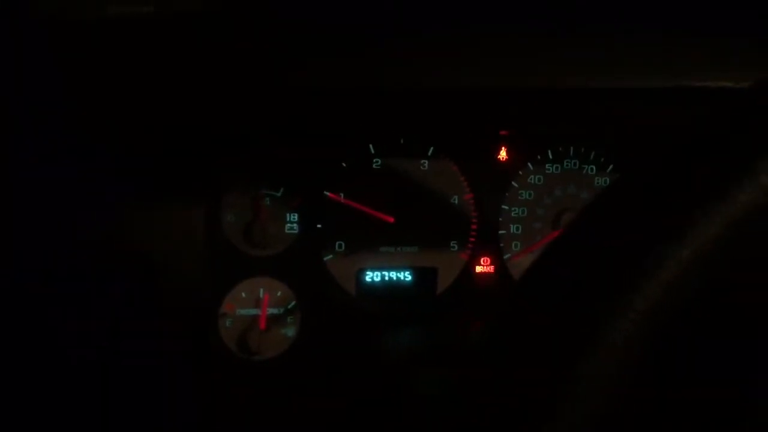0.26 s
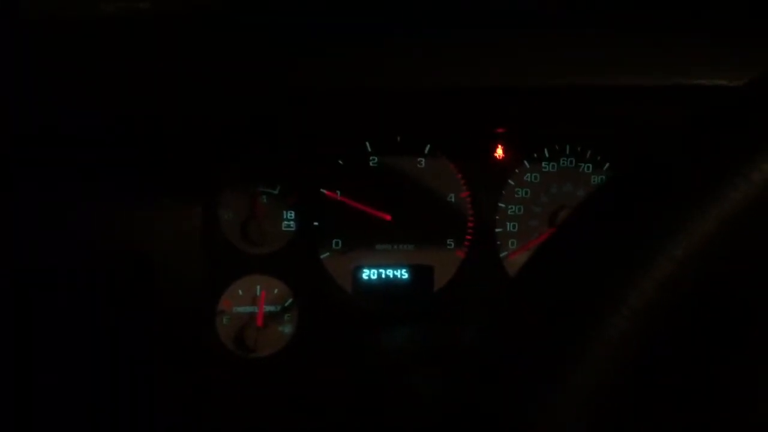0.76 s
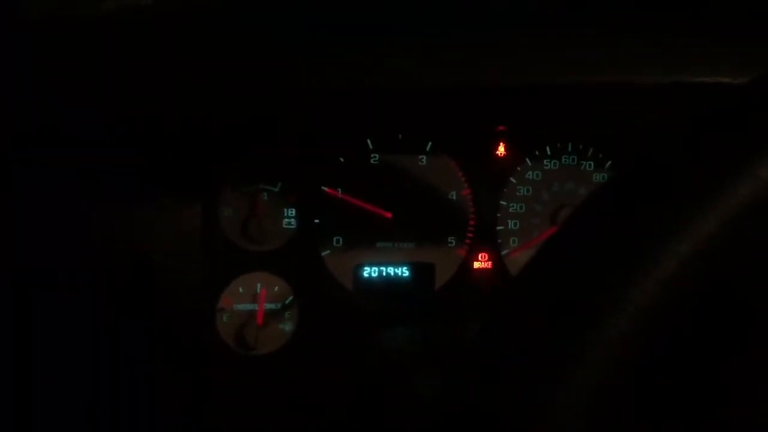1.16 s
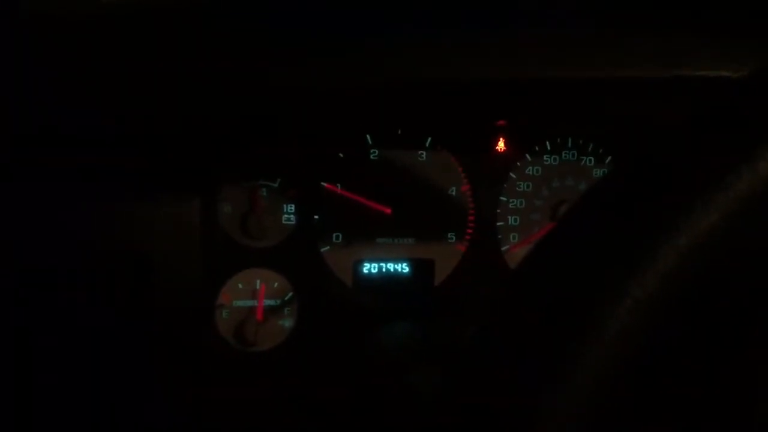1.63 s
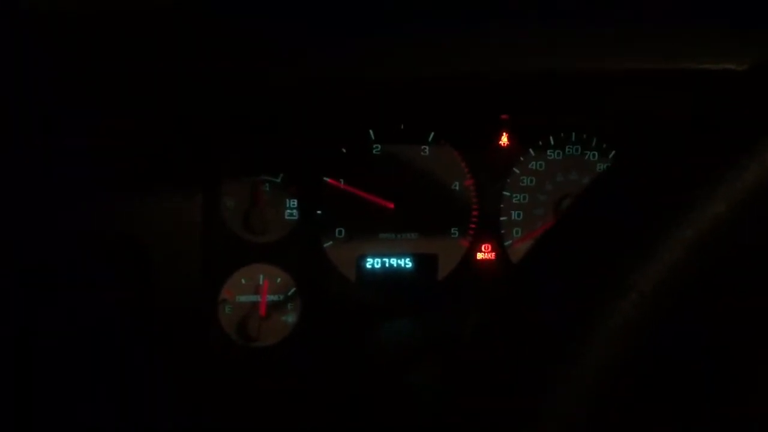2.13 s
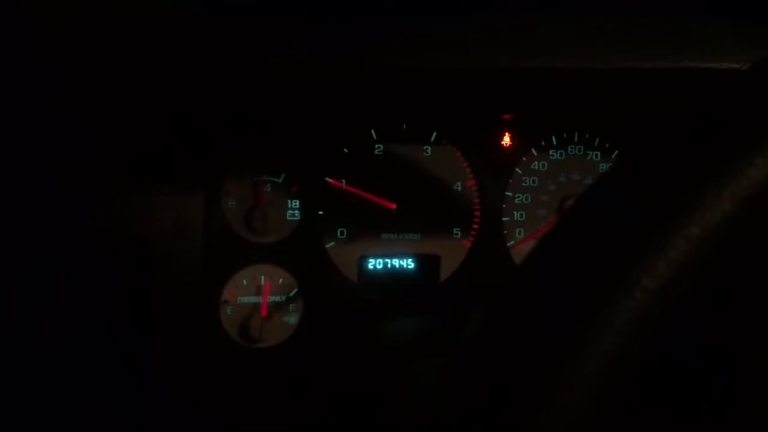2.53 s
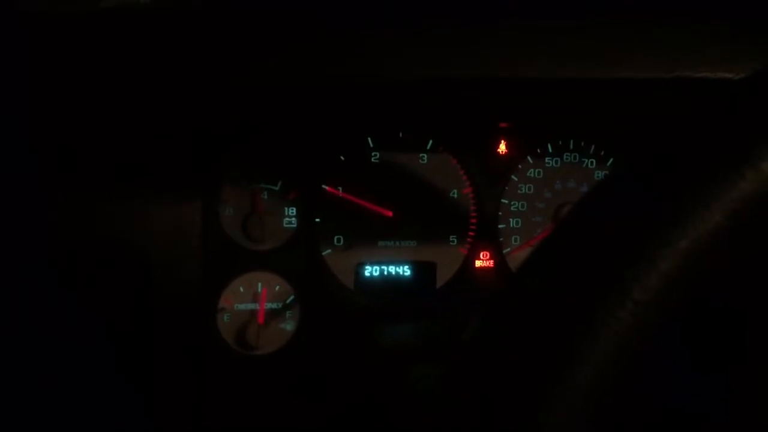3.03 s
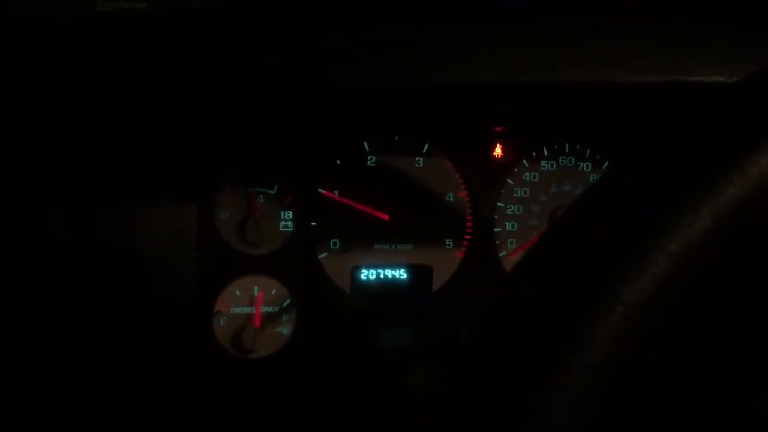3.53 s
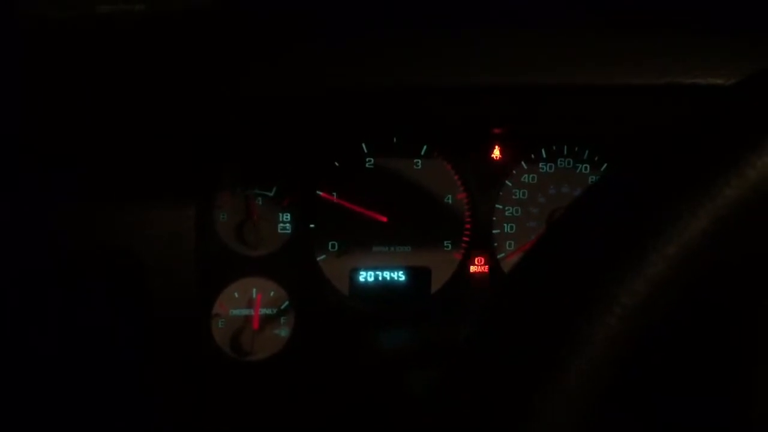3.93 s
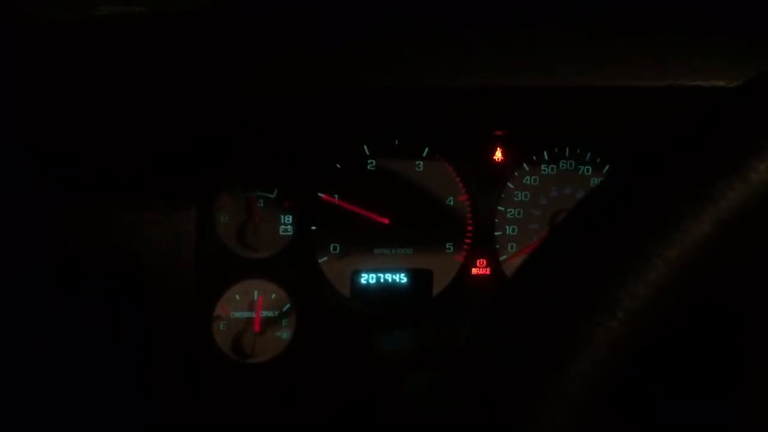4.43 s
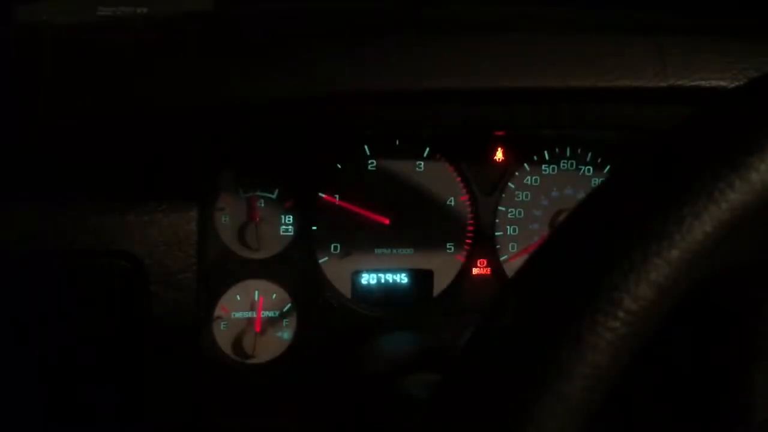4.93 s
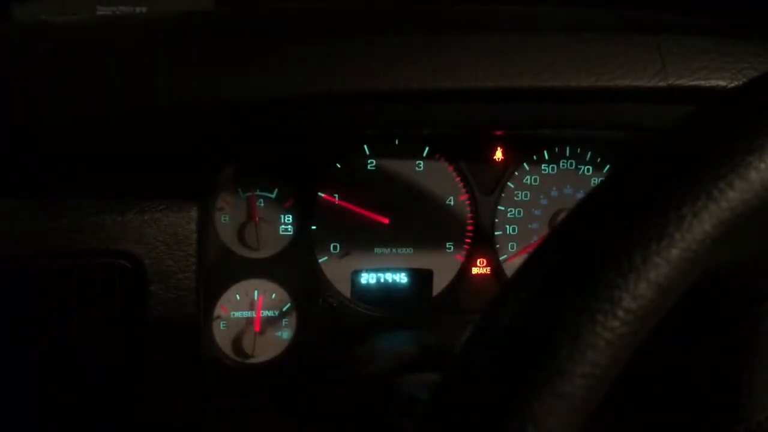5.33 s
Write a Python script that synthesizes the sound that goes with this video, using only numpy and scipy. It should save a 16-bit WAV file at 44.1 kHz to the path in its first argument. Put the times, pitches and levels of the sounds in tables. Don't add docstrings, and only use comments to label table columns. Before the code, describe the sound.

From 0 s a warm, heavy six-cylinder diesel is already idling at about 1000 rpm, heard inside a closed truck cab by a phone facing the dashboard. Deep, boomy low tones dominate, firing about fifty times a second with a slower rolling pattern repeating roughly eight times a second. Over them lies a dense, muffled mechanical clatter, dull in the treble, with light valve knocks, faint gear whine, tiny crisp injector ticks and very quiet airy hiss. The idle is even until about 2.3 s, when the pitch dips very slightly until about 2.6 s, then recovers by 3 s. From 3.6 to 4.2 s a longer load pulls the speed down again; the drone shifts colour, and whine and knocks soften. The engine partly recovers at 4.4 s and continues with small wavering, the load easing slightly towards the end. It cuts off abruptly near 5.6 s, still idling.

```python
import sys
import numpy as np
from scipy import signal
from scipy.fft import rfft, irfft
from scipy.io import wavfile

SR = 44100
rng = np.random.default_rng(int(sys.argv[2]) if len(sys.argv) > 2 else 0)


def amplitude_ratio(level_db):
    exponent = np.asarray(level_db, float) / 20
    return 10 ** exponent


def wav_record(signal):
    frames = np.transpose(np.atleast_2d(signal))
    bounded = np.clip(frames, -1, 1)
    quanta = np.round(bounded * 32767).astype(np.int16)
    wavfile.write(sys.argv[1], SR, quanta)


N = 246078


def level(x, db):
    return x * amplitude_ratio(db) / np.sqrt(np.mean(x ** 2))


def curve(points):
    table = np.array(points)
    return np.interp(np.arange(N) / SR, table[:, 0], table[:, 1])


def colour(x, spectrum):
    hz, db = np.transpose(spectrum)
    bins = np.maximum(np.arange(N // 2 + 1) * SR / N, 1)
    return irfft(rfft(x) * amplitude_ratio(np.interp(np.log(bins), np.log(hz), db)), N)


def ring(x, hz, width):
    return signal.lfilter(*signal.iirpeak(hz, hz / width, fs=SR), x)


def walk(rate):
    steps = int(N / SR * rate) + 2
    position = np.linspace(0, N / SR * rate, N)
    return np.interp(position, np.arange(steps), 1.2 * rng.standard_normal(steps))


def orders(table, cycle, load, sway_db, sway_rad, rate):
    out = np.zeros(N)
    for count, free_db, loaded_db, push in table:
        db = free_db + load * (loaded_db - free_db) + 1
        size = push * amplitude_ratio(db + sway_db * walk(rate))
        out += size * np.cos(2 * np.pi * count * cycle - 1.3 + sway_rad * walk(rate))
    return out


def cab_boom(cycle, load):
    # (vibrations per cycle, free level [dB], loaded level [dB], push +1 or pull -1)
    lines = [(5, -57, -59, -1), (6, -31, -32, -1), (7, -50, -54, -1), (8, -37, -40, -1), (9, -26, -27, 1),
             (10, -40, -41, -1), (11, -41, -44, 1), (12, -27, -26, 1), (13, -50, -48, 1), (14, -37, -49, 1),
             (15, -43, -39, 1), (16, -31, -37, -1), (17, -50, -44, -1), (18, -30, -28, 1),
             (19, -41, -43, 1), (20, -51, -46, 1), (21, -36, -40, 1), (22, -40, -38, 1), (23, -44, -49, -1),
             (24, -35, -40, 1), (25, -47, -47, 1), (26, -53, -49, 1), (27, -47, -49, 1), (28, -50, -49, -1),
             (30, -47, -41, 1), (31, -52, -53, 1), (36, -50, -49, -1)]
    peak = cycle - .788 + .004 * load
    return amplitude_ratio(1.88) * orders(lines, peak, load, sway_db=.6, sway_rad=.1, rate=7)


def gears(cycle, load):
    # (crank place where teeth line up [0-1], swell place [0-1], swell depth [0-1],
    # lines of (vibrations per cycle, free level [dB], loaded level [dB], push +1 or pull -1))
    trains = [
        (.19, .6, 0, [(38, -58, -54, 1), (39, -59, -58, -1), (42, -56, -61, 1), (50, -61, -56, -1)]),
        (.288, .3, .1, [(60, -59, -65, -1), (72, -58, -54, 1), (84, -58, -58, 1), (90, -59, -59, 1)]),
        (.723, .14, .7, [(100, -51, -63, -1), (102, -62, -62, 1), (105, -51, -54, -1)]),
        (.979, .45, .4, [(114, -58, -64, -1), (123, -58, -63, 1), (132, -58, -66, 1), (135, -59, -62, 1)]),
        (.616, .63, .6, [(140, -53, -64, 1), (144, -51, -61, -1), (146, -52, -49, -1)]),
        (.392, .2, .2, [(168, -60, -65, 1), (170, -62, -65, -1)]),
        (.066, .95, .45, [(261, -72, -76, 1), (267, -72, -79, 1), (269, -71, -79, 1)]),
    ]
    out = 0
    cycle = cycle + .0004 * walk(4)
    for at, swell_at, depth, table in trains:
        looseness = np.clip(1 - 2.6 * load, 0, 1)
        swell = 1 + depth * looseness * np.cos(2 * np.pi * (cycle - swell_at))
        out = out + swell * orders(table, cycle - at, load, sway_db=.8, sway_rad=.22, rate=5)
    return out * amplitude_ratio(1.8 + 1.2 * load)


def clatter(cycle, load):
    # (frequency [Hz], width [Hz], level [dB], loudest cycle place [0-1], swell depth [0-1])
    modes = [(600, 40, -3, .2, .1), (860, 60, -9, .14, .6), (1060, 120, -2, .47, .35),
             (1210, 40, -5, .63, .5), (1400, 70, -2, .2, .2), (2250, 100, -3, .95, .5)]
    # (frequency [Hz], level per Hz [dB])
    spectrum = [(30, -32), (60, 8), (100, 9), (170, 6), (260, 2), (400, -9.5), (520, -10), (800, -8.5),
                (1100, -10.5), (1500, -15.5), (1900, -21.5), (2600, -27), (3500, -35), (6000, -53)]
    repeat = 0.35
    length = SR * 6 // 50
    place = cycle % 1 * length
    habit = np.zeros(N)
    for share in (1 - load, load, 0.62 * walk(1.487), 0.21 * walk(1.8)):
        pattern = rng.standard_normal(length + 1)
        habit += share * np.interp(place, np.arange(length + 1), pattern)
    noise = np.sqrt(repeat) * level(habit, 0) + np.sqrt(1 - repeat) * rng.standard_normal(N)
    noise = noise * (1 + .04 * np.cos(2 * np.pi * (6 * cycle - .3)))
    walls = noise
    for hz, width, mode_db, at, depth in modes:
        swell = 1 + depth * (1 - 0.2 * load) * np.cos(2 * np.pi * (cycle - at))
        walls = walls + amplitude_ratio(mode_db + .5 * walk(1.3)) * swell * ring(noise, hz, width)
    walls = walls * amplitude_ratio(.4 * walk(4))
    return level(colour(walls, spectrum), -34)


def air_hiss():
    # (frequency [Hz], level per Hz [dB])
    spectrum = [(1500, -13), (3000, -3.5), (4500, -7), (6000, -11.5), (8000, -16.5), (11000, -24.5),
                (13000, -21.5), (15800, -30)]
    return level(colour(rng.standard_normal(N), spectrum) * amplitude_ratio(1.3 * walk(1.4)), -70.5)


def panels(x):
    hz = np.arange(0, SR / 2 + 99, 44.68)
    rough_db = 2.5 * np.clip(hz / 1500 - 1, 0, 1)
    db = rough_db * rng.standard_normal(len(hz))
    bins = np.arange(N // 2 + 1) * SR / N
    return irfft(rfft(x) * amplitude_ratio(np.interp(bins, hz, db)), N)


def injectors(cycle):
    # (frequency [Hz], width [Hz], level [dB])
    pipe_modes = [(4270, 130, -11), (4720, 200, -5), (5280, 150, -8), (5430, 120, 3), (5620, 120, -11),
                  (6500, 130, -9), (7060, 120, -12), (8280, 200, -11), (9900, 250, -16), (11600, 250, -11),
                  (12400, 280, -10), (13500, 200, -8), (14600, 300, -13), (15600, 200, -12)]
    # (frequency [Hz], level per Hz [dB])
    snap_spectrum = [(1500, -28.5), (2800, -20.5), (3600, -14.5), (4600, -1), (5500, -5), (6300, -34.5),
                     (8000, -5.5), (10500, -7), (12000, -7.5), (15500, -26)]
    cylinder_db = [0, .3, .4, .2, -.3, -1.6]
    firing = np.floor(6 * (cycle - .01)).astype(int)
    times = np.flatnonzero(np.diff(firing)) + 1
    chance = rng.standard_normal((len(times), 24))
    base_db = np.array(cylinder_db)[firing[times] % 6] + .8 * chance[:, 0]

    hits = np.zeros(N)
    for k, (late_s, db) in enumerate([(0, 0), (.0022, -6), (.0075, -12)]):
        delay_s = late_s + .0003 * chance[:, 1 + k]
        at = np.clip(times + (delay_s * SR).astype(int), 0, N - 1)
        hits[at] += amplitude_ratio(base_db + db + chance[:, 5 + k])

    def fading_noise(decay_s):
        return signal.lfilter([1], [1, -np.exp(-1 / (decay_s * SR))], hits) * rng.standard_normal(N)

    rattle = fading_noise(0.0042)
    pipes = np.zeros(N)
    spans = np.diff(np.r_[0, times[1:] - 99, N])
    for k, (hz, width, db) in enumerate(pipe_modes):
        strike = np.repeat(amplitude_ratio(1.2 * chance[:, 9 + k]), spans)
        pipes += amplitude_ratio(db) / np.sqrt(width) * ring(hits * strike + amplitude_ratio(-27) * rattle, hz, width)

    burst = np.hanning(70) * rng.standard_normal(70)
    snap = np.convolve(hits, burst)[20:N + 20]
    snap = snap + .4 * fading_noise(0.00058) + amplitude_ratio(-14) * rattle
    return level(pipes, -68.5) + level(colour(snap, snap_spectrum), -75)


def valves(cycle, load):
    # (place in the cycle [0-1], level [dB])
    knocks = [
        (.21, -6),
        (.43, -4),
        (.53, -3),
        (.9, 0),
        (.94, -4),
        (.17, -9),
        (.69, -9),
    ]
    # (frequency [Hz], width [Hz], level [dB])
    cover_modes = [(2220, 80, 0), (2310, 90, -4), (3120, 80, -13), (3540, 100, -16)]
    hits = np.zeros(N)
    for place, knock_db in knocks:
        times = np.flatnonzero(np.diff(np.floor(cycle - place)))
        chance = rng.standard_normal((len(times), 2))
        at = times + (.0008 * SR * chance[:, 0]).astype(int)
        hits[np.clip(at, 0, N - 1)] += amplitude_ratio(knock_db + 1.5 * chance[:, 1])
    cover = np.zeros(N)
    for hz, width, mode_db in cover_modes:
        cover += amplitude_ratio(mode_db) / np.sqrt(width) * ring(hits, hz, width)
    return level(ring(cover, 2700, 2500), -62) * amplitude_ratio(-6 * load)


def scene():
    # (time [s], firing rate [per s])
    speed = [(0, 50.06), (1.0, 50.13), (2.1, 50.23), (2.3, 49.97), (2.55, 49.37), (3.0, 50.28),
             (3.7, 50.18), (4.0, 49.36), (4.2, 49.25), (4.4, 50.0), (4.8, 49.66), (5.2, 49.93),
             (5.58, 49.83)]
    # (time [s], load [0-1])
    pull = [
        (0, 0.02),
        (2.25, 0.07),
        (2.6, 0.3),
        (3.0, 0),
        (3.6, .12),
        (3.95, 0.8),
        (4.4, 1),
        (4.7, 0.8),
        (5.2, .95),
        (5.58, .7),
    ]
    cycle = np.cumsum(curve(speed)) / 6 / SR
    load = np.clip(curve(pull), 0, 1.1)
    boom = cab_boom(cycle, load)
    whine = gears(cycle, load)
    through_firewall = panels(clatter(cycle, load) + air_hiss())
    mix = boom + whine + through_firewall + injectors(cycle) + valves(cycle, load)
    return mix[None]


def top_cut(x):
    return signal.sosfilt(signal.butter(12, 15830, fs=SR, output="sos"), x)


def record(dry):
    fade = np.clip(np.arange(N)[::-1] / (.003 * SR), .3, 1)
    return top_cut(dry * fade)


dry = scene()
out = record(dry)
wav_record(out)
```